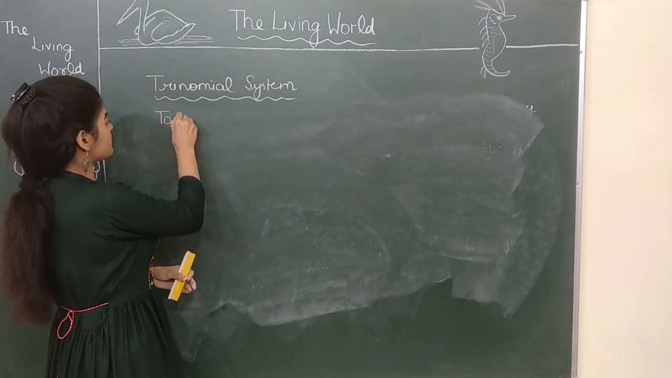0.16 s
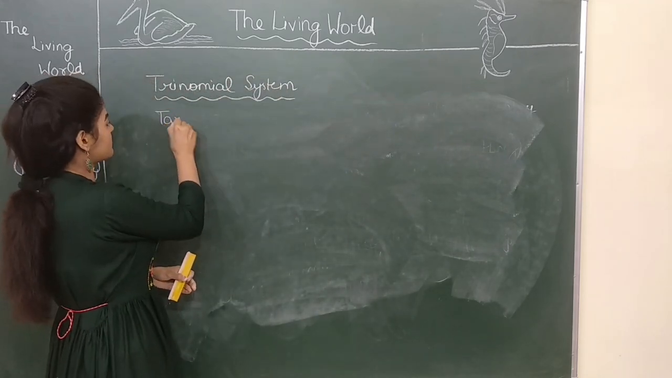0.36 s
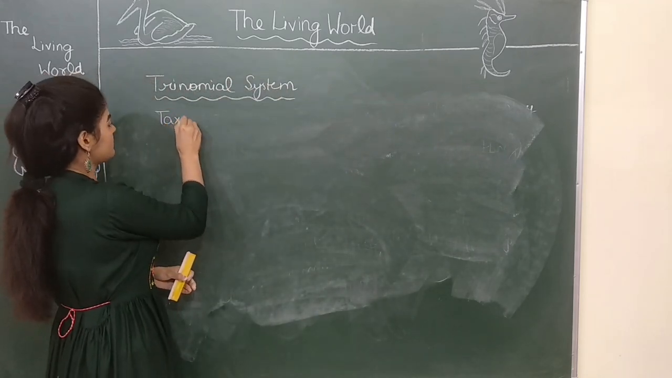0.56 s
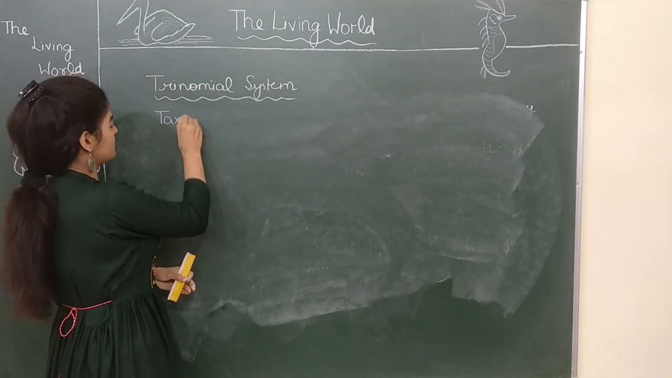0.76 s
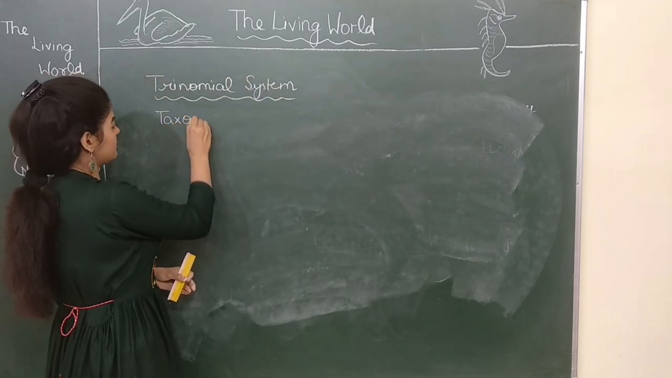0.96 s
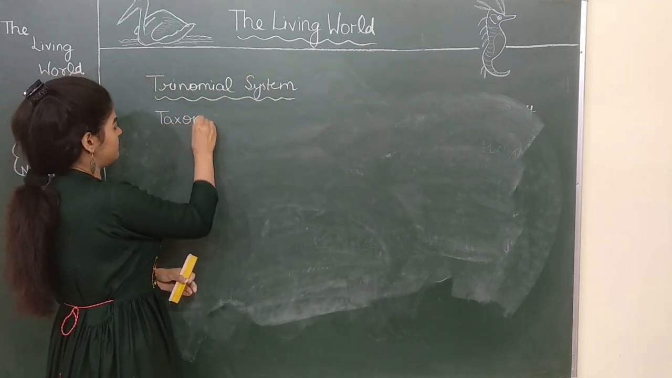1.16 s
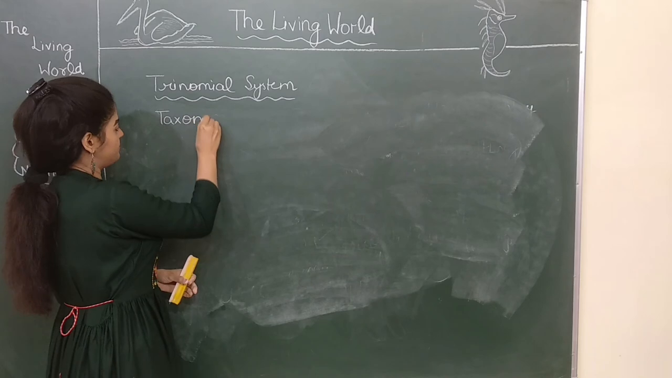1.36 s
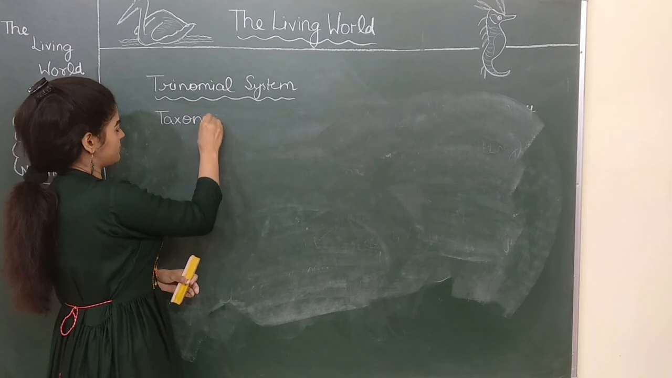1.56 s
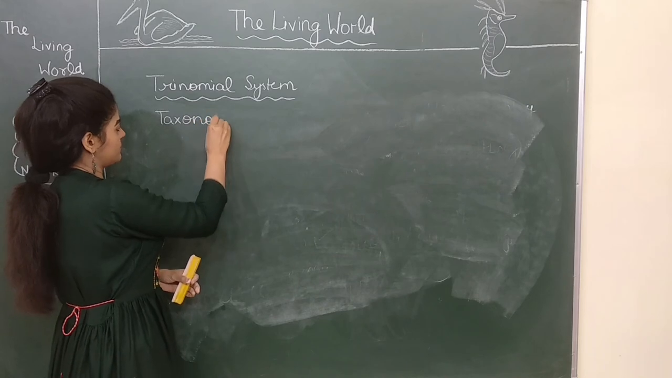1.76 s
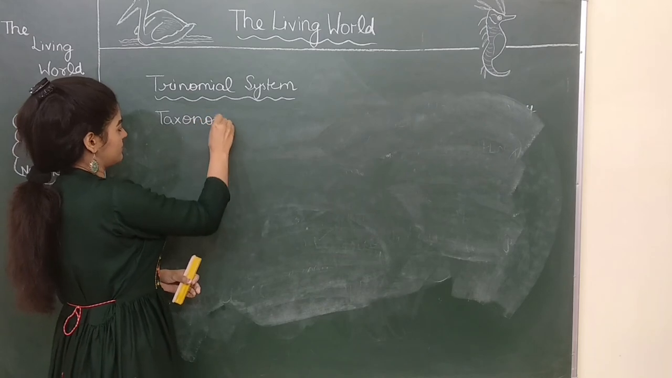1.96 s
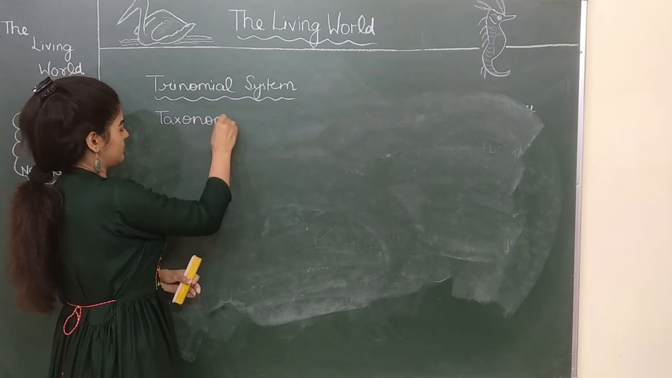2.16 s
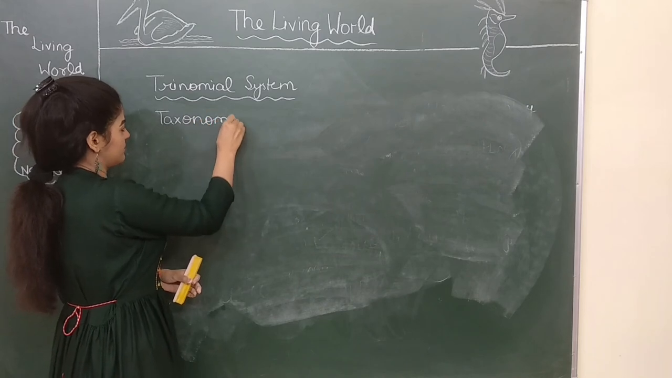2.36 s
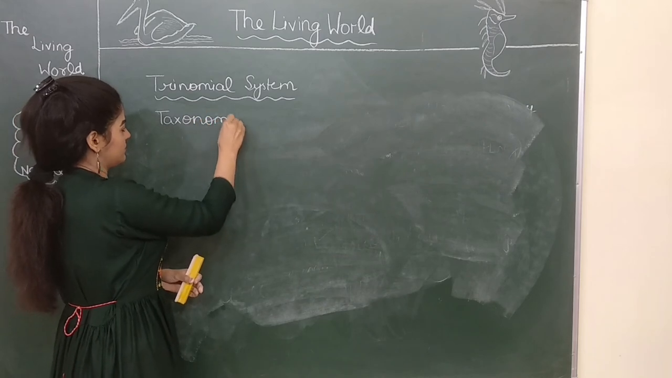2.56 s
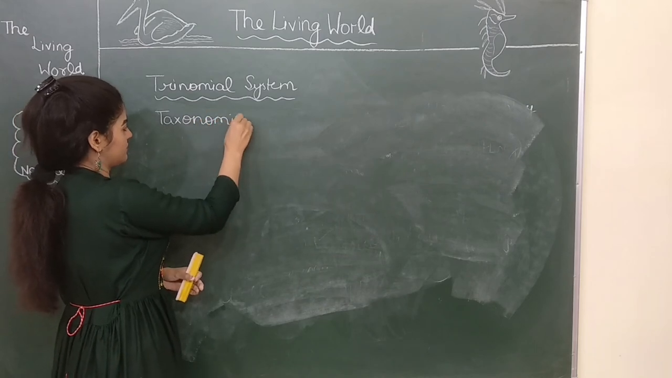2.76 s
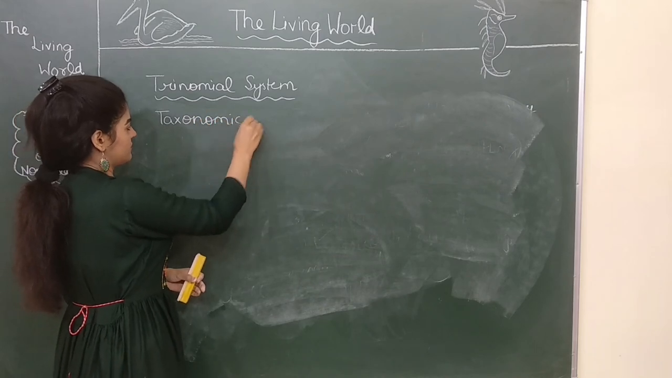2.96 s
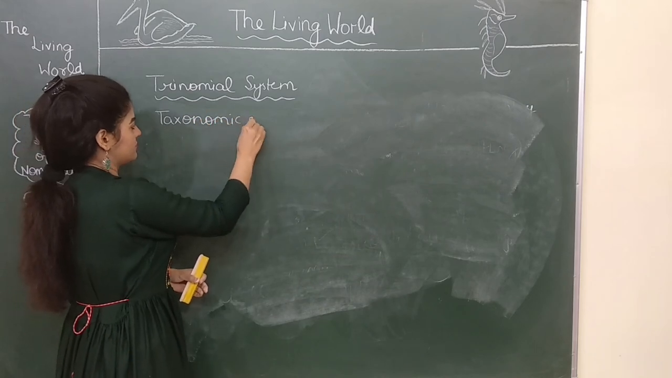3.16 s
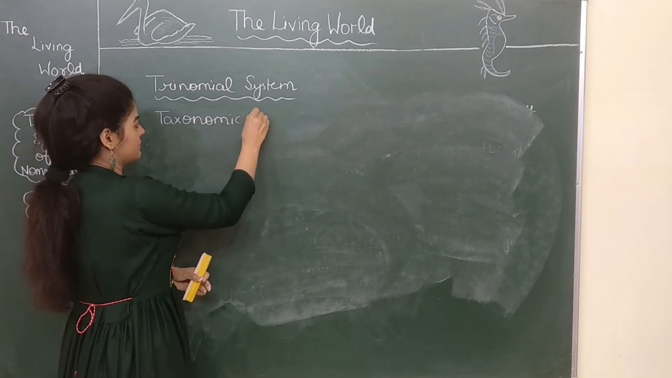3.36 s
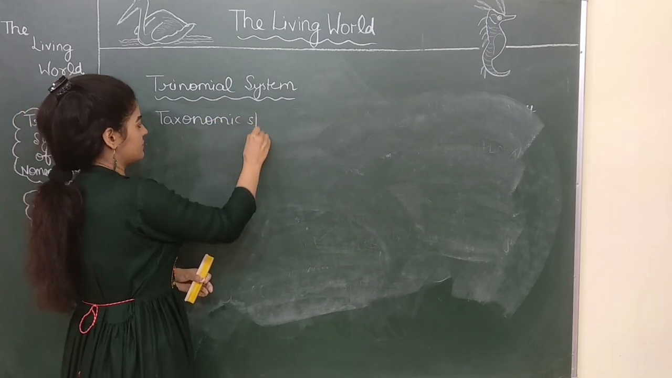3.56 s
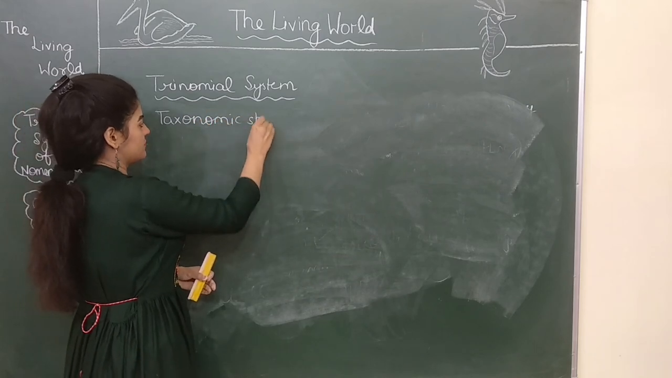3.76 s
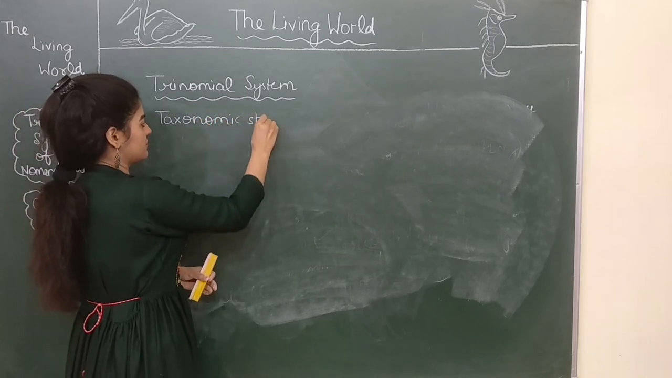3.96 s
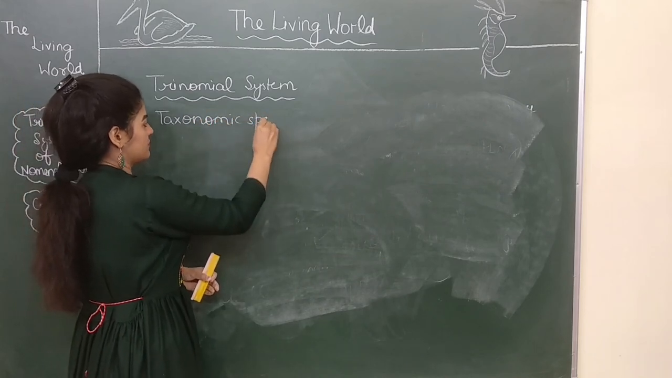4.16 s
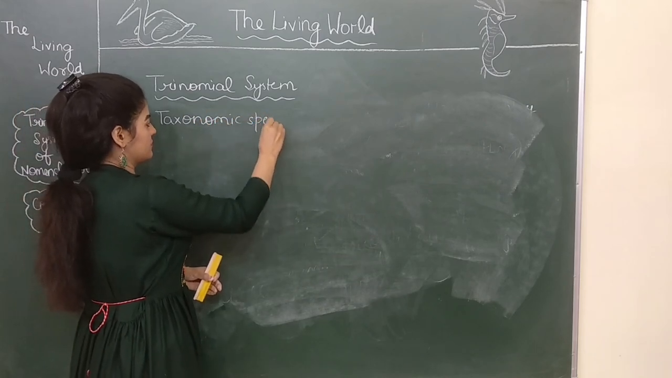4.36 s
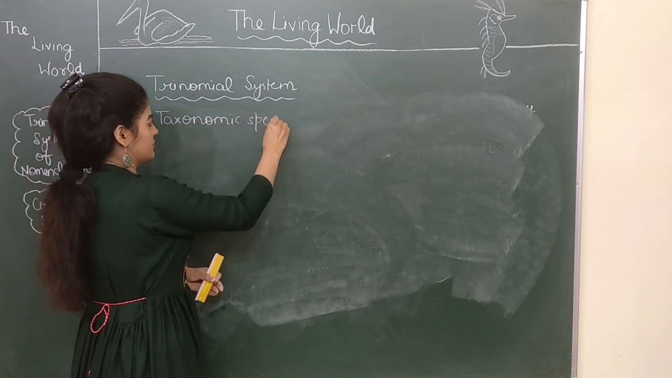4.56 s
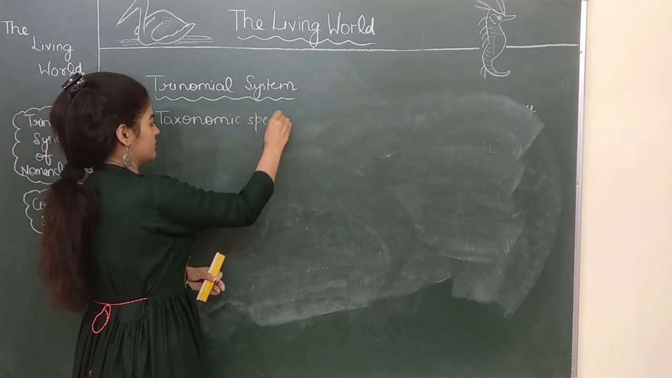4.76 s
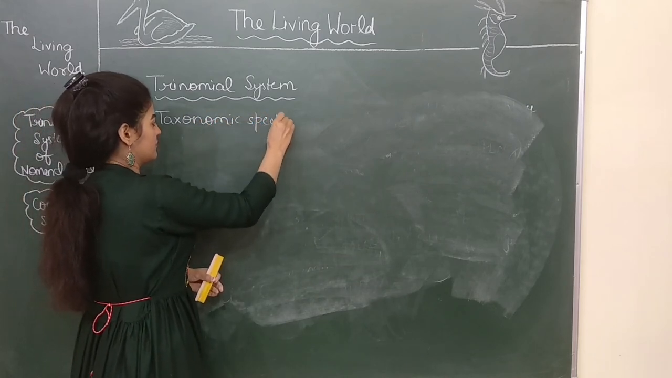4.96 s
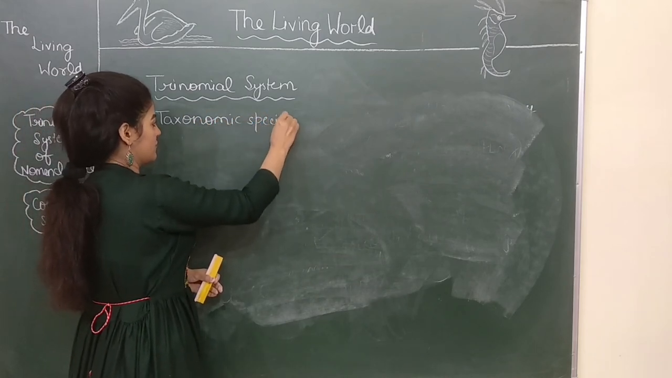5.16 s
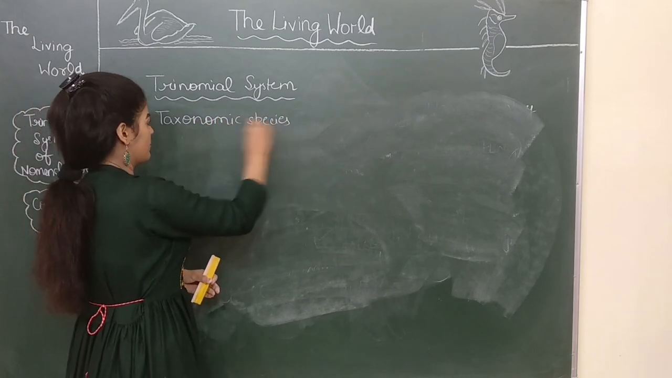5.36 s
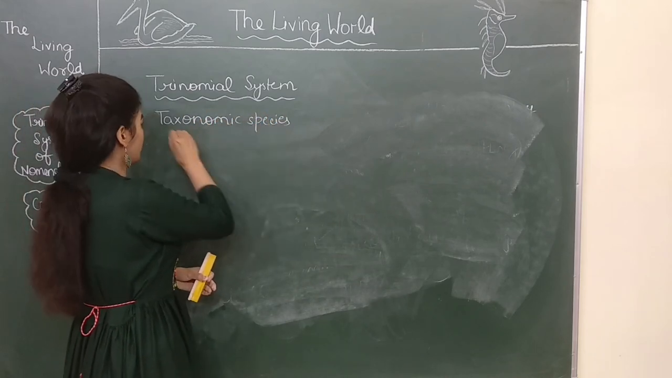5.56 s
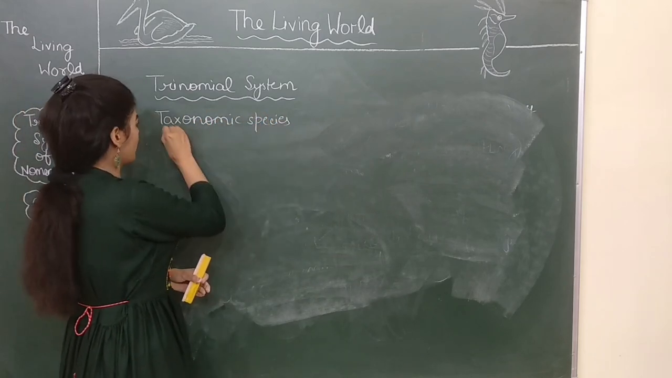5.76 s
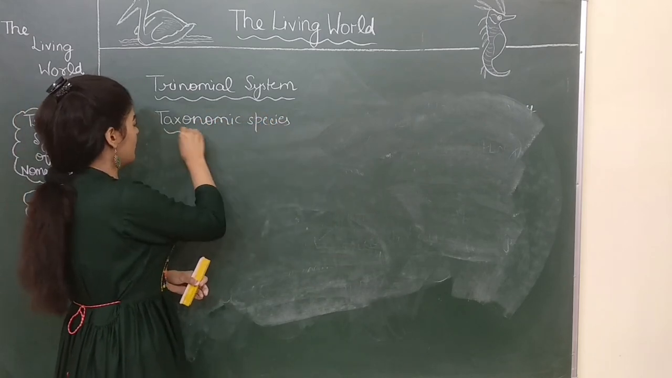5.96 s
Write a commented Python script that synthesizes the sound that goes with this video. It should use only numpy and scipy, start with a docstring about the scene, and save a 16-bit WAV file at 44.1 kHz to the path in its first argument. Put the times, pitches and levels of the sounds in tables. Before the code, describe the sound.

Hard chalk taps ring a wooden-sounding board with close echoes and a short room tail. Between them, brief strokes rasp with powdery hiss and grit over soft drumming of the heavy panel. Taps cluster at the start, pause while strokes continue, then return brighter, with a tiny squeak around 3 seconds. Quiet room air, mono, heard from a few metres.

```python
"""Chalk on a classroom blackboard

Chalk writes a line of words on a wall blackboard in a bare room, a few metres from one microphone.
Each hard tap is a short contact force that rings a board mode, with close echoes and reverberation.
Between taps the chalk drags by stick and slip: one stream of tiny slips is filtered into powder hiss,
coarse grit and board murmur, while noise shaped by the heavy panel modes drums underneath.
Light touches, bumps, thin chirps and still air complete the scene."""
import sys
import numpy as np
from scipy import signal
from scipy.fft import rfft, irfft, next_fast_len
from scipy.io import wavfile
from scipy.ndimage import uniform_filter1d

SR = 44100
rng = np.random.default_rng(int(sys.argv[2]) if len(sys.argv) > 2 else 0)


def transcribe(signal):
    """Save signal, clipped to [-1, 1], as a 16-bit WAV file at the path in sys.argv[1]."""
    frames = np.atleast_2d(signal).T
    limited = np.clip(frames, -1, 1)
    pcm = np.round(limited * 32767).astype(np.int16)
    wavfile.write(sys.argv[1], SR, pcm)


N = 264179  # samples


def amp(db):
    """Decibel definition: level to amplitude ratio."""
    return 10 ** (np.asarray(db) / 20)


def evened(x):
    """Power normalization: scales to rms 1."""
    return x / np.sqrt(np.mean(x ** 2) + 1e-20)


def unit(x):
    """Energy normalization: scales to a sum of squares of 1."""
    return x / np.sqrt(np.sum(x ** 2) + 1e-20)


def read(points, hz):
    """Logarithmic pitch scale: interpolates a table along log frequency."""
    f, value = np.transpose(points)
    return np.interp(np.log(hz + 1), np.log(f + 1), value)


def add(mix, s, sound):
    """Superposition: adds a sound to the mix at time s."""
    part = mix[max(round(s * SR), 0):][:len(sound)]
    part += sound[:len(part)]


def colour(x, points):
    """Linear filtering: multiplies the spectrum of x by the gains of a table."""
    size = next_fast_len(len(x))
    gain = amp(read(points, np.fft.rfftfreq(size, 1 / SR)))
    return irfft(rfft(x, size) * gain, size)[:len(x)]


def resonance(f, hz, width):
    """Damped oscillator: complex response of one mode."""
    return 1j * f * width / (hz ** 2 - f ** 2 + 1j * f * width)


def ring(x, hz, width):
    """Resonant filtering: passes x through one damped mode."""
    b, a = signal.iirpeak(hz, hz / width, fs=SR)
    return signal.lfilter(b, a, x)


def burst(length, size=4096):
    """Exponential decay: a cluster of fractures with time constant length in seconds."""
    return rng.standard_normal(size) * np.exp(-np.arange(size) / SR / length)


def causal(points, size=4096):
    """Minimum phase: a damped body with the given spectrum is silent before the blow."""
    log_gain = np.log(amp(read(points, abs(np.fft.fftfreq(size, 1 / SR)))))
    return np.exp(np.conj(signal.hilbert(log_gain)))[:size // 2 + 1]


# chalk landing on the board: (time [s], relative energy [dB], ring frequency [Hz],
# direct ring width [Hz], contact hardness as corner frequency [Hz], first echo delay [ms],
# second echo delay [ms], tip crunch relative to the tap [dB], room send [dB])
TAPS = [(0.0193, 11.5, 1220, 364, 2940, 2.4, 3.1, -19, -1),
        (0.2473, 11.5, 1290, 364, 3200, 2.42, 3.2, -15, 0),
        (0.5461, 13, 1310, 340, 3200, 2.39, 3.44, -23, -0.5),
        (2.67, 9.5, 1560, 445, 5900, 2.24, 6.2, -13.5, 0.5),
        (2.8077, 6.5, 1680, 920, 7600, 2.33, 2.6, -12, -1),
        (3.0703, 10.5, 1530, 354, 4570, 2.12, 2.85, -14, 1.5),
        (3.4247, 13, 1443, 374, 3180, 2.08, 2.85, -19, -1),
        (3.7374, 10.5, 1580, 350, 5430, 2.14, 2.9, -14.5, -0.5),
        (4.009, 12.5, 1465, 373, 3220, 2.055, 3.04, -19.5, 0),
        (4.7604, 10.5, 1430, 646, 2570, 2.24, 3.75, -20, 0.5),
        (4.8872, 11, 1590, 760, 2680, 2.08, 3.8, -17, 0), (5.681, 12, 1268, 227, 1230, 2.72, 3.13, -34, -4)]
# how well the struck board radiates: (frequency [Hz], gain [dB])
RADIATION = [(200, -5), (400, 0.5), (720, -1.5), (950, 3.5), (1250, 2.5), (1700, 1), (2050, 2.5),
             (2400, 2.5), (2800, -1.5), (3600, 0.5), (6000, 4), (15000, 5.5)]
# spectrum of the snapping tip: (frequency [Hz], relative level [dB])
CRUNCH_SPECTRUM = [(800, -9), (2500, 13), (4500, -16), (7000, 5.5), (11000, -1), (16000, -4.5)]


def taps(second_echo=-0.44, first_echo=1.07, spread=1.83, crunch_s=0.0019, crumbs=0.3,
         click_echo=0.43, click_send_db=-3, thud_db=-23, size=4096):
    """Impact excitation: a short contact rings the board, two echoes comb it, and the room answers."""
    out = np.zeros(N)
    f = np.fft.rfftfreq(size, 1 / SR)
    board = causal(RADIATION)
    snap = causal(CRUNCH_SPECTRUM)
    thud = amp(thud_db) * unit(irfft(resonance(f, 301, 110)))
    for s, db, hz, width, hard_hz, first_ms, second_ms, tip_db, room_db in TAPS:
        # a softer contact lasts longer and sounds duller
        blow = board / (1 + 1j * f / hard_hz) ** 2
        first = np.exp(-2j * np.pi * f * first_ms / 1000)
        second = np.exp(-2j * np.pi * f * second_ms / 1000)
        echoes = 1 + first_echo * first + second_echo * second
        direct = unit(irfft(blow * resonance(f, hz, width) * echoes))

        # the tip gives way in one sharp snap and a few crumbs
        fractures = 1 + click_echo * first + crumbs * rfft(unit(burst(crunch_s)))
        crunch = amp(tip_db) * unit(irfft(snap * fractures))

        # the room hears the whole panel from every side, so its ring is broader
        broad_ring = resonance(f, hz, width * spread) * resonance(f, hz, 5200)
        radiated = unit(irfft(blow * broad_ring)) + thud
        radiated = radiated + amp(tip_db + click_send_db) * unit(irfft(snap))

        add(out, s, amp(db) * (direct + crunch + thud))
        add(out, s, amp(db + room_db) * signal.fftconvolve(radiated, room()))
    return out


def slips(per_s, spread_db, smooth):
    """Stick-slip friction: random clicks of uneven size over finer crumbling."""
    clicks = (rng.random(N) < per_s / SR) * rng.choice([-1., 1.], N)
    clicks = clicks * amp(spread_db * np.minimum(rng.exponential(1, N), 4))
    judder = evened(uniform_filter1d(rng.standard_normal(N), size=400))
    crumbling = smooth * rng.standard_normal(N)
    return (evened(clicks) + crumbling) * amp(0.93 * judder)


# one stroke for each line or loop of a letter: (start [s], length [s], relative powder hiss [dB],
# relative coarse grit [dB], relative board murmur [dB])
STROKES = [(0.052, 0.077, -53, -49, -41), (0.294, .11, -54.5, -51, -36.5), (0.423, 0.063, -74.5, -66, -47),
           (0.603, 0.16, -54, -51.5, -34), (.765, 0.15, -53.5, -50, -36), (.87, 0.087, -53, -50, -36),
           (1.01, 0.062, -51, -47.5, -36), (1.121, 0.11, -52, -52.5, -34),
           (1.223, 0.076, -53, -47.5, -39.5), (1.331, 0.058, -54.5, -50, -35),
           (1.439, 0.091, -53, -49.5, -39.5), (1.536, .09, -52.5, -49.5, -36.5),
           (1.638, .05, -59, -53, -45), (1.678, 0.11, -53.5, -48, -37.5), (1.832, 0.049, -52, -47.5, -39),
           (1.94, 0.099, -55.5, -54.5, -37.5), (2.027, 0.066, -53, -49, -39),
           (2.162, 0.088, -57.5, -57.5, -40.5), (2.231, .085, -57, -46.5, -40),
           (2.375, .055, -59, -48, -37.5), (2.487, 0.083, -69, -54, -55.5), (2.688, .05, -72, -47, -39),
           (2.804, 0.14, -60, -49, -45), (2.956, 0.031, -55, -42, -44), (3.025, 0.029, -74, -52, -47),
           (3.079, 0.068, -70, -40.5, -36), (3.18, 0.083, -65, -48.5, -42),
           (3.285, 0.036, -63.5, -48.5, -44.5), (3.487, .11, -51.5, -42.5, -44),
           (3.617, 0.051, -71, -58, -46.5), (3.741, .11, -59, -48, -42), (4.03, 0.054, -61, -86, -33),
           (4.14, 0.11, -65, -55, -56), (4.246, 0.041, -56, -52.5, -42), (4.312, 0.038, -54.5, -56, -32),
           (4.387, 0.062, -58, -59, -47.5), (4.503, 0.06, -62, -57, -40), (4.62, 0.059, -66, -61.5, -52),
           (4.772, 0.023, -60, -61, -63), (4.902, 0.27, -66, -62.5, -53), (5.147, 0.079, -58, -58, -41),
           (5.265, 0.063, -58, -63, -48.5), (5.342, .026, -48, -44, -30), (5.405, 0.067, -71, -62.5, -55),
           (5.687, 0.039, -48, -58, -35), (5.785, 0.058, -57, -56, -44.5), (5.836, 0.1, -50, -51.5, -37),
           (5.957, .065, -51, -56, -36.5)]
BITE_S, LIFT_S = .016, 0.019  # rise as the tip bites, time constant as it slides off
ENDS_DB = -2  # the hand is slower at both ends of a stroke than in its middle


def stroke_levels():
    """Friction envelope: each stroke bites, swells with the speed of the hand, and lifts."""
    power = np.zeros((3, N))
    for s, length, *levels in STROKES:
        t = np.arange(0, length + 10 * LIFT_S, 1 / SR)
        speed = np.sin(np.pi * np.minimum(t / length, 1))
        bite = np.minimum(t / BITE_S, 1)
        lift = np.exp(-np.maximum(t - length, 0) / LIFT_S)
        for layer, db in zip(power, levels):
            gain = bite * lift * amp(db + ENDS_DB * (1 - speed))
            add(layer, s, gain ** 2)
    return np.sqrt(power)


def shifting(x):
    """Time-varying spectrum: the tip turns and wears, so its colour drifts in patches."""
    z = signal.stft(x, nperseg=512)[2]
    patches = uniform_filter1d(rng.standard_normal(z.shape), size=6, axis=0)  # along frequency
    patches = evened(uniform_filter1d(patches, size=12, axis=1))  # along time
    return evened(signal.istft(z * amp(2.4 * patches), nperseg=512)[1][:N])


# board modes under the dragging chalk: (frequency [Hz], width [Hz],
# relative level at the start of the line [dB], relative level at its end [dB])
BOARD_MODES = [(507, 52, -1.5, -8.5), (655, 100, -4.5, -11.5), (912, 64, -9, -2.5), (952, 29, -18.5, 0),
               (1126, 120, -6.5, -2.5), (1229, 89, 4.5, -1), (1300, 120, 2.5, -14), (1508, 89, -8, -4),
               (1590, 53, -3.5, -5), (1755, 96, -5, -13.5), (1954, 150, -12, -2), (2159, 160, -11, -9),
               (2270, 130, -10, -19), (2980, 260, -11, -16)]
# powder hiss spectrum: (frequency [Hz], relative level [dB])
POWDER_SPECTRUM = [(4000, -11), (7000, -8), (9000, -8.5), (11000, -2.5), (12500, 3), (14200, 3),
                   (16000, -1)]
# coarse grit spectrum: (frequency [Hz], relative level [dB])
GRIT_SPECTRUM = [(1200, -2), (2400, 6.5), (3300, 3), (4500, -1.5), (6200, -6), (7500, -8), (9500, -12.5),
                 (13000, -25.5)]


def dragging(wander_db=2.5):
    """Modal excitation by friction: one stream of slips becomes powder hiss, grit and board murmur."""
    powder, grit, murmur = stroke_levels()
    force = slips(per_s=3500, spread_db=2.0, smooth=0.77)
    board = np.zeros(N)
    place = np.linspace(0, 1, N)  # along the line of writing
    for hz, width, start_db, end_db in BOARD_MODES:
        # the chalk crosses the nodes of each mode: slowly along the line, quickly within a letter
        loops = np.interp(place, np.linspace(0, 1, 50), rng.standard_normal(50))
        coupling = amp(start_db + (end_db - start_db) * place + wander_db * loops)
        # bending waves reach each mode at their own moment
        arriving = np.roll(force, rng.integers(300))
        board += ring(coupling * arriving, hz, width)
    # overall board tilt: (frequency [Hz], gain [dB])
    board = colour(board, [(100, -19.5), (420, -5.5), (600, -0.5), (2150, 1),
                           (2400, -4.0), (4000, -14.0), (9000, -22.0)])
    hiss = amp(1.5) * powder * shifting(colour(force, POWDER_SPECTRUM))
    scrape = amp(1.5) * grit * shifting(colour(force, GRIT_SPECTRUM))
    return hiss + scrape + amp(-1.5) * murmur * evened(board)


# weight of the hand resting on the panel, as its drumming: (time [s], level [dB])
LEAN = [(0, -53.5), (1.1, -44.5), (1.75, -54.5), (2.35, -54.5), (2.64, -62), (2.85, -52), (3.4, -58),
        (4.5, -52), (4.7, -60.5), (5, -53.5), (5.4, -55), (5.62, -65.5), (5.75, -54)]
# heavy panel modes: (frequency [Hz], relative level [dB])
PANEL_SPECTRUM = [(30, -17), (80, -19.5), (120, -34.5), (150, -18), (170, -9), (215, -2.5), (265, 1),
                  (320, -5.5), (400, -5), (480, -18), (700, -27), (1500, -58.5)]
DRAG_SHAKE_DB = -16  # drumming relative to a stroke's tabled murmur level
TAP_SHAKE_DB, SHAKE_T60_S = -56, .5  # drumming relative to a tap's energy, and its decay time


def drumming():
    """Addition of powers: resting hand, strokes and taps each shake the slow, heavy panel modes."""
    t = np.arange(N) / SR
    leaning = amp(np.interp(t, *np.transpose(LEAN)))
    dragged = amp(DRAG_SHAKE_DB) * stroke_levels()[-1]
    power = leaning ** 2 + dragged ** 2
    for s, db, *_ in TAPS:
        add(power, s, amp(db + TAP_SHAKE_DB - 60 * t[:SR] / SHAKE_T60_S) ** 2)
    shaking = slips(per_s=330, spread_db=3.0, smooth=0.77)
    return np.sqrt(power) * evened(colour(shaking, PANEL_SPECTRUM))


# light touches and chips of chalk: (time [s], energy [dB], ring frequency [Hz],
# ring width [Hz], burst time constant [s])
TOUCHES = [(0.374, -24, 5200, 2500, 0.0025), (0.474, -13.5, 1220, 600, 0.0076),
           (.494, -16, 2680, 1400, 0.006), (.784, -5.5, 1220, 296, 0.006), (2.006, -4.5, 1240, 200, 0.0088),
           (2.124, -23, 1170, 909, 0.0046), (2.98, -8.5, 1490, 700, .006), (4.319, -4, 1300, 780, 0.008),
           (5.36, -15.5, 1670, 886, .007), (5.854, -6, 5120, 2300, 0.0013), (5.891, -7, 2150, 1080, 0.0015)]


def touches():
    """Resonant filtering: short fracture bursts pass through two damped modes at one frequency."""
    out = np.zeros(N)
    for s, db, hz, width, length in TOUCHES:
        touch = ring(ring(burst(length), hz, width), hz, 2 * width)
        add(out, s, amp(db) * unit(touch))
    return out


# the hand bumping the panel: (time [s], relative energy [dB])
BUMPS = [(0.781, -6), (1.126, -7), (1.525, -8), (1.95, -9), (2.119, -9.5), (5.893, -4.5)]


def bumps():
    """Low-mode excitation: a soft, dull burst drives two broad low modes."""
    out = np.zeros(N)
    for s, db in BUMPS:
        bump = ring(ring(burst(0.0063), 270, 140), 230, 280)
        add(out, s, amp(db - 5.5) * unit(bump))
    return out


# thin high chirps: (time [s], length [s], start frequency [Hz], end frequency [Hz], peak level [dB])
CHIRPS = [(3.023, 0.033, 5120, 5070, -46), (3.677, 0.063, 7100, 8370, -56.5)]


def chirps():
    """Frequency modulation: phase is the running integral of a gliding frequency."""
    out = np.zeros(N)
    for s, length, start_hz, end_hz, db in CHIRPS:
        hz = np.linspace(start_hz, end_hz, int(length * SR))
        tone = np.sin(2 * np.pi * np.cumsum(hz) / SR)
        add(out, s, amp(db) * np.hanning(len(hz)) * tone)
    return out


# spectrum of the diffuse tail: (frequency [Hz], relative level [dB])
ROOM_COLOUR = [(100, -10.5), (250, -3), (500, -4), (1000, -2.5), (1500, -0.5), (2200, 0), (4000, -0.5),
               (8000, -9), (15000, -5.5)]
# classroom decay: (frequency [Hz], time to fall 60 dB [s])
ROOM_T60 = [(150, 0.67), (500, 0.57), (1200, 0.41), (2500, 0.42), (5000, 0.36), (9000, 0.5), (15000, 0.28)]
# build-up of the room's answer: (time [s], relative level [dB])
BUILD_UP = [(0, 0.5), (.007, -3), (.02, -4), (.024, 1.5), (.06, 4.5), (.12, 4)]
# early reflections from the writer, floor and walls: (delay [s], relative level [dB])
REFLECTIONS = [(.0072, -38), (.0094, -14), (0.012, -18), (0.0152, -19.5), (0.025, -18)]


def room():
    """Reverberation: early reflections plus a diffuse tail that decays at its own rate in each band."""
    t = np.arange(SR * 3 // 4) / SR
    hz, frame_s, z = signal.stft(rng.choice([-1., 1.], len(t)), SR, nperseg=256)
    decay_db = 60 * frame_s / read(ROOM_T60, hz)[:, None]
    z = z * amp(read(ROOM_COLOUR, hz)[:, None] - decay_db)
    tail = signal.istft(z, SR, nperseg=256)[1][:len(t)]
    tail = tail * amp(np.interp(t, *np.transpose(BUILD_UP)) - 32)
    for s, db in REFLECTIONS:
        add(tail, s, amp([db]))
    return tail


# still air of the room: (frequency [Hz], relative level [dB])
AIR_SPECTRUM = [(30, -23), (100, -28.5), (160, -13.5), (260, 2), (330, -24), (500, -14), (1000, -27.5),
                (2000, -36), (4000, -30), (15500, -36)]
AIR_DB = -57  # rms


def still_air():
    """Stationary random noise: a steady background with a fixed spectrum."""
    return amp(AIR_DB) * evened(colour(rng.standard_normal(N), AIR_SPECTRUM))


def scene():
    """Superposition: taps, writing with its reverberation, drumming and still air."""
    writing = dragging() + touches() + bumps() + chirps()
    wet = signal.fftconvolve(writing, room())[:N]
    return (taps() + writing + amp(-7.0) * wet + drumming() + still_air())[None]


EDGE_HZ = 15950  # upper band limit


def record(dry, low_cut_hz=120, gate_db=-50.0, depth=1.0):
    """Band limiting and expansion: bass cut, a mild gate on quiet passages, then a treble limit."""
    x = signal.sosfilt(signal.butter(3, low_cut_hz, "highpass", fs=SR, output="sos"), dry)
    power_db = 10 * np.log10(abs(uniform_filter1d(x ** 2, size=1100)) + 1e-12)
    # depth: dB of attenuation per dB below the gate, over at most 8 dB
    x = x * amp(-depth * np.clip(gate_db - power_db, 0, 8))
    lowpass = signal.firwin(401, EDGE_HZ, window=("kaiser", 9), fs=SR)
    return signal.oaconvolve(x, lowpass[None], "same")


dry = scene()
out = record(dry)
transcribe(out)
```